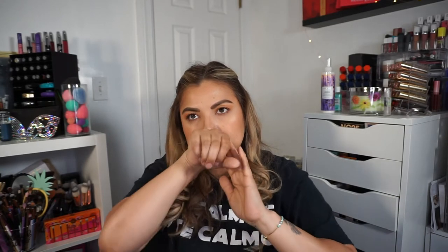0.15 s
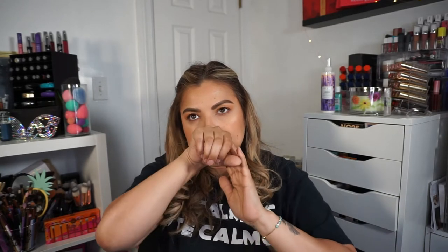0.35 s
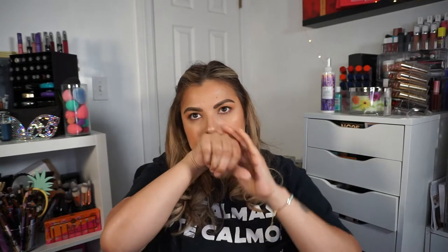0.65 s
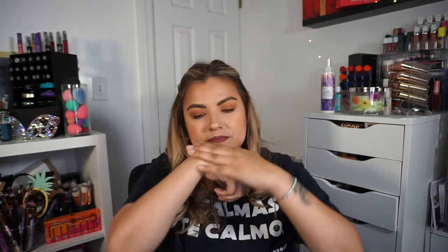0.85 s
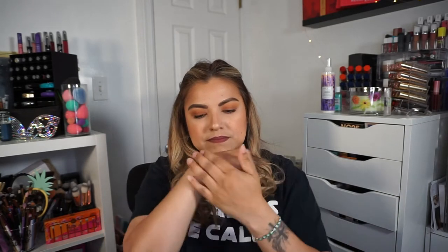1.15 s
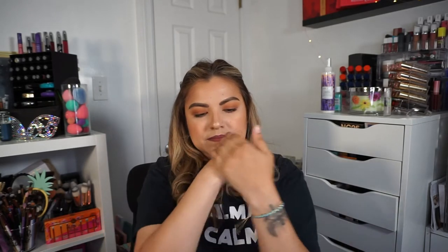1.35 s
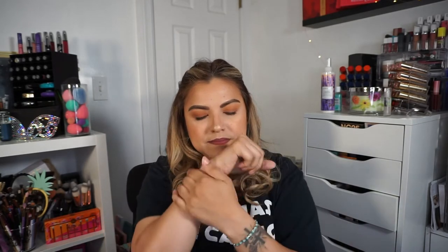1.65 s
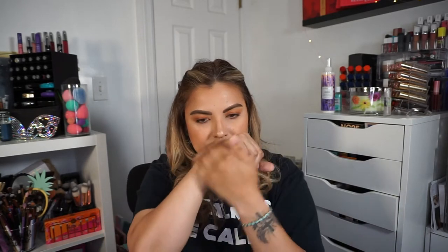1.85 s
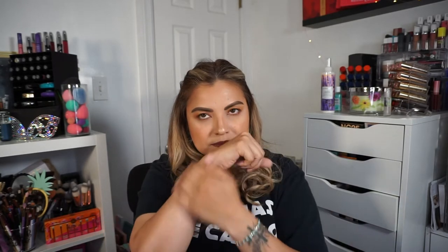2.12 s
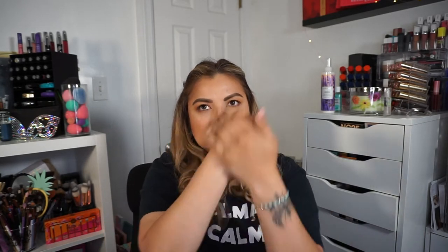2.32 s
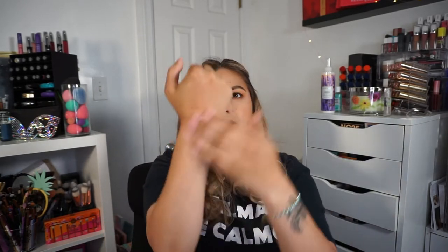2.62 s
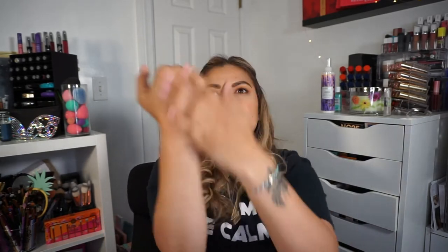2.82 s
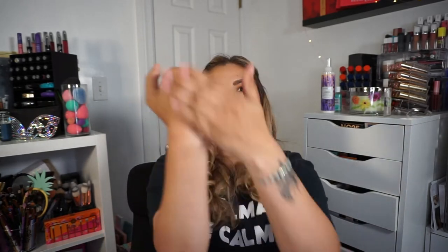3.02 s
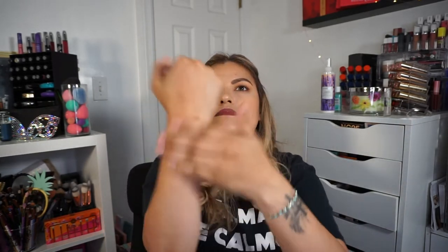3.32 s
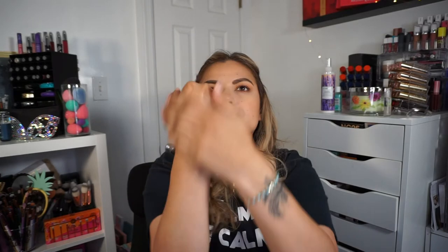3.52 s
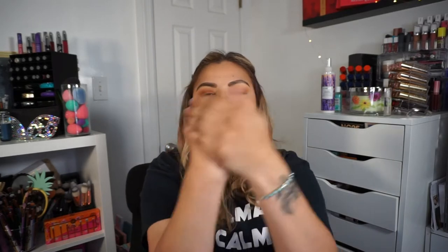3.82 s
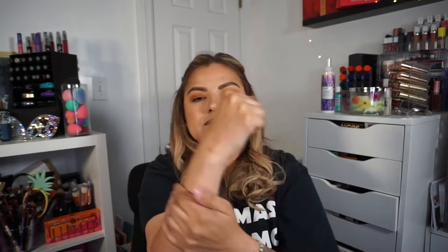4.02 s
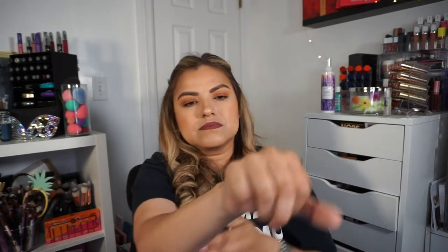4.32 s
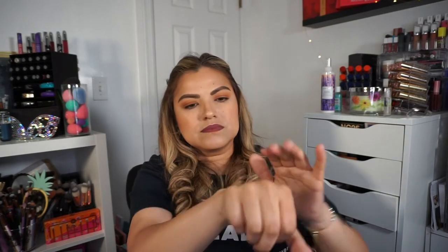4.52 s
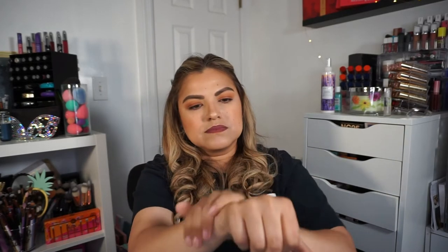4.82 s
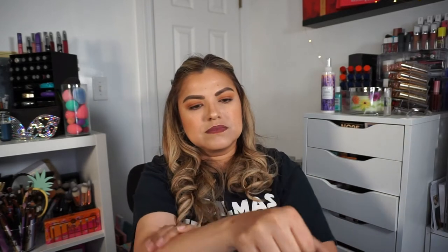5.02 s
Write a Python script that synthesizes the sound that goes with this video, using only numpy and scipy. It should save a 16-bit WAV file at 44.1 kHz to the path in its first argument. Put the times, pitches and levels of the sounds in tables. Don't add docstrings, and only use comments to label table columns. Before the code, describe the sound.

Indoors, close to a stereo microphone, oiled hands slide over each other and the forearm. From 0 to 0.35 s a soft, airy swish fades; after a short lull, gentle uneven strokes follow from about 0.5 to 1.5 s, the clearest near 0.85 s. A brighter stroke comes around 1.6 s, and from 2 s the rubbing turns quick and regular, four or five swishes a second, fine-grained and hissy, strongest between 3 and 4.1 s, with small raspy catches of skin. The tone slides between darker and sharper as the palms cup. It softens after 4.2 s and nearly pauses around 4.5. At 4.67 s fingers land in one light, crisp pat of tiny ticks with a very short room reply, then slower, smooth strokes finish to just past 5 s. Throughout, a faint low motor hum, mild rumble and quiet hiss remain behind the hands.

```python
import sys
import numpy as np
from scipy import signal
from scipy.fft import rfft, irfft
from scipy.io import wavfile

SR = 44100
rng = np.random.default_rng(int(sys.argv[2]) if len(sys.argv) > 2 else 0)


def store_pcm(level_fs):
    pcm = np.round(np.clip(level_fs, -1, 1) * 32767).astype(np.int16)
    wavfile.write(sys.argv[1], SR, np.atleast_2d(pcm).T)


def gain_from_decibels(decibels):
    exponent = np.asarray(decibels, float) / 20
    return 10 ** exponent


N = 227586


def at_hz(points, hz):
    points_hz, values = np.array(points).T
    return np.interp(np.log(hz), np.log(points_hz), values)


def drift(rate_hz):
    r = np.exp(-2 * np.pi * rate_hz * 40 / SR)
    noise = rng.standard_normal(N // 40 + 2002)
    slow = signal.lfilter([1], [1, -2 * r, r * r], noise)[2000:]
    return np.interp(np.arange(N) / 40, np.arange(len(slow)), slow / slow.std())


def bands(low_hz, per_octave):
    edges = low_hz * 2 ** (np.arange(40) / per_octave)
    edges = edges[edges < 19800]
    return [(np.sqrt(low * high), signal.butter(3, [low, high], "band", fs=SR, output="sos"))
            for low, high in zip(edges, edges[1:])]


def spread(mid, side, alike):
    alike = np.clip(alike, -.98, .98)
    shared = np.sqrt(1 + alike) * mid
    unshared = np.sqrt(1 - alike) * side * [[1], [-1]]
    return (shared + unshared) / np.sqrt(2)


def slips(grain_db):
    size_db = grain_db * np.minimum(rng.exponential(1, N), 5)
    jerks = rng.standard_normal((2, 2, N)) * gain_from_decibels(size_db)
    return jerks / jerks.std() * np.sqrt(SR / 2)


# (time [s], boost [dB], around [Hz])
CATCHES = [(.055, 3.5, 5000), (.81, 3.5, 5500), (1.65, 6, 1600), (2.322, 5, 12000), (2.37, 4.5, 3300),
           (2.71, 2, 11000), (2.778, 7.5, 5500), (2.962, 4.5, 11000), (3.475, 2, 2500), (3.915, 3.5, 4300),
           (4.055, 5.5, 4500), (4.29, 4.5, 9000), (4.99, 3, 4480)]


def catches_db(t, hz):
    catch_s, catch_octaves = 0.017, 0.89
    s, db, around_hz = np.transpose(CATCHES)[:, :, None]
    octaves = np.log2(hz / around_hz) / catch_octaves
    return np.sum(db * np.exp(-((t - s) / catch_s) ** 2 - octaves ** 2), axis=0)


# (start [s], length [s], fine hiss at full speed [dB], moment of full speed [0-1],
# palm contact [dB])
STROKES = [(-0.13, 0.47, -49.0, 0.25, -3.5), (0.505, 0.25, -55.5, 0.88, -6.5),
           (0.691, 0.33, -46, 0.46, -2.5), (0.913, 0.41, -55.5, 0.07, 0.5), (1.081, 0.19, -51, 0.63, -3.2),
           (1.211, 0.16, -48.5, 0.49, -2.5), (1.251, 0.31, -48, 0.55, 2), (1.51, 0.27, -41, 0.42, 0.5),
           (1.79, 0.27, -46, 0.6, -6.5), (2.027, 0.27, -42.5, 0.41, -2), (2.262, 0.22, -40, 0.4, -1.9),
           (2.381, 0.28, -41, 0.71, 0), (2.586, 0.24, -38, 0.51, -0.5), (2.809, 0.22, -38, 0.42, -1),
           (3.004, 0.19, -37.5, 0.38, -1), (3.116, 0.27, -37.6, 0.52, 0.5), (3.335, 0.21, -36, 0.58, -0.7),
           (3.499, 0.27, -36, 0.47, -2.7), (3.725, 0.17, -39, 0.52, 0.2), (3.843, 0.3, -35, 0.71, -0.3),
           (4.148, 0.35, -42, 0.32, 0.4), (4.687, 0.26, -41, 0.49, 0), (4.876, 0.53, -43, 0.24, 0.4)]
# (hollow of the hands at the start [Hz], at the end [Hz], its boost [dB],
# gain of palm contact along the stroke [dB])
GRIPS = [(5880.0, 5000, 3, -16), (6860.0, 4700, 6.5, -7.6), (6800, 2600, 5, -5), (3870.0, 4560.0, 5, -5),
         (4460.0, 4800, 7.5, -5), (4520.0, 3500, 5.5, 8.9), (3040.0, 3400, 3.2, -3.4),
         (3100, 5900, 4.5, 2.9), (3190.0, 6700, 6.5, 14), (4160.0, 5600, 6.5, 1.5), (5170.0, 1700, 4.5, 6),
         (1560.0, 7000, 4.5, -1.5), (11200.0, 7700, 4, 10.5), (7160.0, 12000, 4.5, 3),
         (13400, 1700, 3.5, 3.1), (1930.0, 10600, 4, -1), (13310.0, 1680.0, 3, 10), (1830.0, 5900, 4.5, -2),
         (7100.0, 6700, 2.1, 12.5), (2570.0, 5900, 6.5, 1), (7160.0, 2700, 3.9, 1), (4170, 3900, 7.5, 11),
         (3700, 4300, 8, -8)]
# (low edge [Hz], high edge [Hz])
ZONES_HZ = [(1600, 3200), (3200, 5500), (5500, 9000), (9000, 15500)]
ZONE_DB = [-21, -11.5, -7, 0]
PALM_SHARE = [1.25, 1.27, 0.7, 0]


def stroke_level(t, hz):
    speed_power, rub_db = 3.58, -0.41
    hollow_octaves = 0.66
    zone_linger_db, linger_t60_s = [-6, -14, -15, -15.5], 1
    centres = np.sqrt(np.prod(ZONES_HZ, axis=1))
    zone_per_hz_db = ZONE_DB - 10 * np.log10(np.diff(ZONES_HZ)[:, 0])
    base_db = at_hz(np.c_[centres, zone_per_hz_db], hz)
    share = at_hz(np.c_[centres, PALM_SHARE], hz)
    linger_db = at_hz(np.c_[centres, zone_linger_db], hz)

    start, length, hiss_db, fastest, palm_db = np.transpose(STROKES)[:, :, None]
    from_hz, to_hz, boost_db, gain_db = np.transpose(GRIPS)[:, :, None]
    along = np.clip((t - start) / length, 0, 1)
    fastest = np.clip(fastest, .05, .95)
    speed = np.sin(np.pi / 2 * np.minimum(along / fastest, (1 - along) / (1 - fastest)))
    hollow_hz = from_hz * (to_hz / from_hz) ** along
    octaves = np.log2(hz / hollow_hz) / hollow_octaves
    contact_db = share * (palm_db + gain_db * (along - .5))
    db = hiss_db + rub_db + base_db + contact_db + boost_db * np.exp(-octaves ** 2)
    power = np.sum(speed ** speed_power * gain_from_decibels(db + catches_db(t, hz)) ** 2, axis=0) + 1e-16

    keep = gain_from_decibels(-120 * (t[1] - t[0]) / linger_t60_s)
    lingering = signal.lfilter([1 - keep], [1, -keep], power)
    return 10 * np.log10(power + gain_from_decibels(linger_db) ** 2 * lingering)


# (frequency [Hz], level [dB])
SKIN = [(320, 3.5), (600, -12.5), (1100, -6), (1700, -3), (2300, 3), (3200, -0.5), (4300, -1), (7000, 0.6),
        (10000, 1.85), (13000, 1.5), (15800, 2)]
# (frequency [Hz], correlation [-1 to 1])
SKIN_LIKENESS = [(600, 0.7), (2500, 0.82), (4500, 0.4), (8000, 0.33), (15000, 0.71)]
# (time [s], left over right [dB],
# share from the hands' direction [0-1])
PLACE = [
    (0.0, -0.5, 0.7),
    (0.07, -1.5, 0.7),
    (1.28, -0.5, 0.8),
    (1.38, -2, 0.55),
    (3.42, 1.5, 0.96),
    (3.48, -1, 0.77),
    (4.2, 0, 0.64),
    (4.71, -2.5, 0.9),
    (5.16, 1, 0.54),
]


def rubbing(patchy_db, tremor_db):
    coarse_t = np.arange(0, N / SR + .005, .005)
    t = np.arange(N) / SR
    source, tremor, out = slips(grain_db=2.3), tremor_db * drift(25), 0
    place_s, place_db, place_share = np.transpose(PLACE)
    pan_db = np.interp(t, place_s, place_db)
    direct = np.interp(t, place_s, place_share)
    for k, (hz, sos) in enumerate(bands(low_hz=298.5, per_octave=3)):
        stroke_db = np.interp(t, coarse_t, stroke_level(coarse_t, hz))
        gain = gain_from_decibels(stroke_db + at_hz(SKIN, hz) + tremor + patchy_db * drift(11.4))
        mid, side = gain * signal.sosfilt(sos, source[k % 2])
        out = out + spread(mid, side, direct * at_hz(SKIN_LIKENESS, hz))
    return out * gain_from_decibels(pan_db * [[.5], [-.5]])


# (frequency [Hz], level [dB rms], wobble [dB])
HUM = [(75.0, -92.0, 3.0), (109.0, -80.0, 2.0), (120.0, -68.0, 1.8), (178.0, -68.5, 1.5),
       (220.85, -55.3, .3), (257.0, -77.0, 2.5), (293.0, -73.5, 1.8), (394.0, -82.0, 3.0),
       (525.0, -83.0, 3.0), (950.0, -80.0, 2.0)]


def hum():
    t, out = np.arange(N) / SR, 0
    for hz, db, wobble_db in HUM:
        phase = 2 * np.pi * (hz * t + rng.random()) + 0.091 * wobble_db * drift(3.3)
        out = out + np.sqrt(2) * gain_from_decibels(db + wobble_db * drift(5.7)) * np.sin(phase)
    return out


# (frequency [Hz], level [dB per Hz])
ROOM = [(25, -30), (48, -31), (64, -26), (88, -28), (115, -18), (200, -12.5), (270, -13.0), (342, -18),
        (620, -15.5), (749, -22.0), (1000, -17.5), (2330, -26), (5000, -30), (15800, -32.5)]
# (frequency [Hz], correlation [-1 to 1])
ROOM_LIKENESS = [(30, .3), (55, 0.18), (100, 1), (200, 0.73), (330, 0.4), (600, -0.061), (3000, -0.42),
                 (15000, -0.17)]
# (time [s], level [dB])
SWELL = [
    (1.8, 1.5),
    (3.0, 4.5),
    (4.4, 4.0),
    (5.2, 3.5),
]


def room_tone(patchy_db):
    room_db, calm_db = -64, -1
    swell_hz, swell_octaves, swell_s = 470, 0.39, 0.29
    t = np.arange(N) / SR
    rumble_db = calm_db + sum(db * np.exp(-((t - s) / swell_s) ** 2) for s, db in SWELL)
    white, out = rng.standard_normal((2, 2, N + SR // 2)), 0
    for k, (hz, sos) in enumerate(bands(low_hz=18.8, per_octave=3)):
        mid, side = signal.sosfilt(sos, white[k % 2])[:, -N:]
        reach = np.exp(-(np.log2(hz / swell_hz) / swell_octaves) ** 2)
        gain = gain_from_decibels(at_hz(ROOM, hz) + reach * rumble_db + patchy_db * drift(6.6))
        out = out + gain * spread(mid, side, at_hz(ROOM_LIKENESS, hz))
    middle = signal.sosfilt(signal.butter(4, [400, 3000], "band", fs=SR, output="sos"), out)
    return gain_from_decibels(room_db + 3.0) * out / middle.std()


# (time [s], peak level [dB])
PAT = [
    (4.6700, -50.0),
    (4.6712, -45.0),
    (4.6727, -32.0),
    (4.6737, -26.5),
    (4.6750, -38.0),
    (4.6762, -39.0),
]
# (frequency [Hz], width [Hz], level [dB])
PAT_MODES = [(900, 580, -11), (2330, 560, -7), (4200, 1200, -2.5), (8500, 1900, 1), (13100, 4000, 2)]


def pat():
    tail_db, tail_t60_s = -41.5, 0.17
    clicks, tick = np.full(N, 1e-18), 0
    for s, db in PAT:
        clicks[round(s * SR)] = gain_from_decibels(db) * 3.5
    for k, (hz, width_hz, db) in enumerate(PAT_MODES):
        r = np.exp(-np.pi * width_hz / SR)
        b = (1 - r * r) / 2 * np.array([1, 0, -1])
        a = [1, -2 * r * np.cos(2 * np.pi * hz / SR), r * r]
        tick = tick + (-1) ** k * gain_from_decibels(db) * signal.lfilter(b, a, clicks)
    since = np.arange(N) / SR - PAT[2][0]
    dying = (since > 0) * gain_from_decibels(tail_db - 60 * np.abs(since) / tail_t60_s)
    bright = signal.butter(1, 2500, "high", fs=SR, output="sos")
    walls = signal.sosfilt(bright, rng.standard_normal((2, N))) * dying
    return tick * gain_from_decibels([[.3], [-.3]]) + walls


def scene():
    left, right = rubbing(patchy_db=1.5, tremor_db=.5) + pat()
    lag_samples = .45
    turn = np.exp(-2j * np.pi * np.arange(N // 2 + 1) / N * lag_samples)
    hands = np.array([left, irfft(rfft(right) * turn, N)])
    return hands + hum() + room_tone(patchy_db=0.93)


def low_pass(x):
    return signal.sosfilt(signal.butter(12, 15830, fs=SR, output="sos"), x)


def record(dry):
    top_hz = 15830
    passed = np.arange(N // 2 + 1) * SR / N < top_hz
    mix = irfft(rfft(dry) * passed, N)
    return low_pass(mix)


dry = scene()
out = record(dry)
store_pcm(out)
```